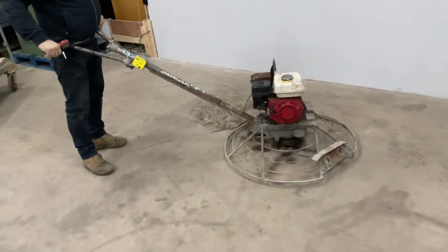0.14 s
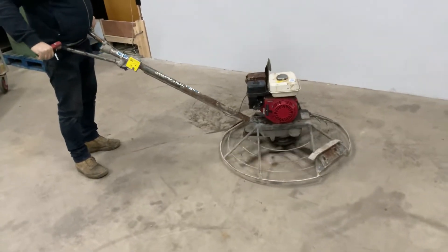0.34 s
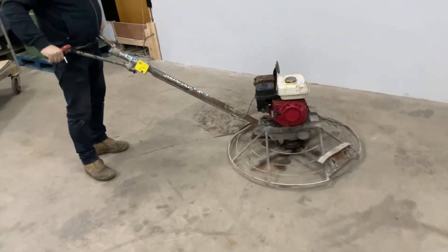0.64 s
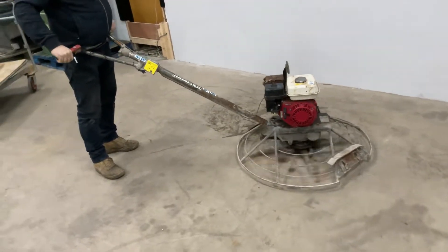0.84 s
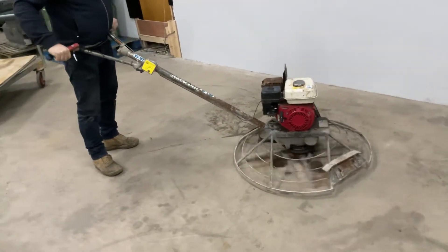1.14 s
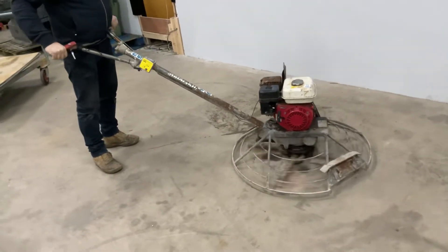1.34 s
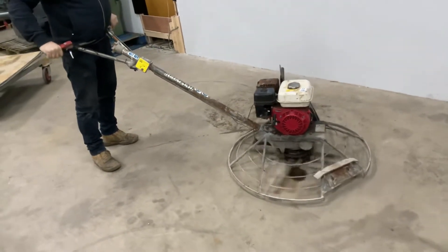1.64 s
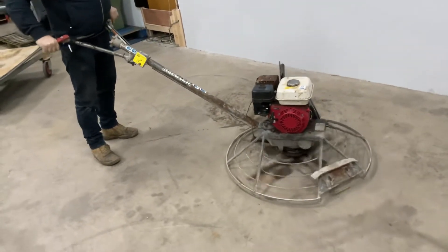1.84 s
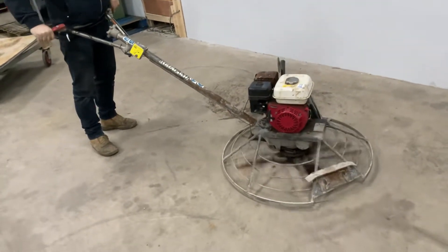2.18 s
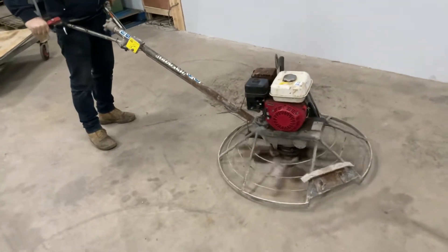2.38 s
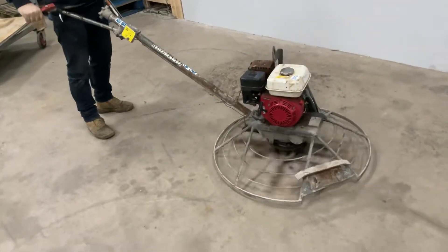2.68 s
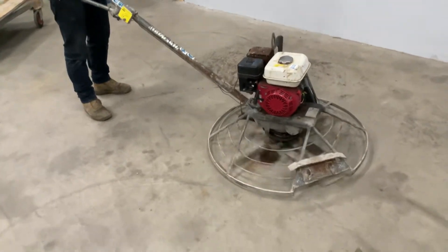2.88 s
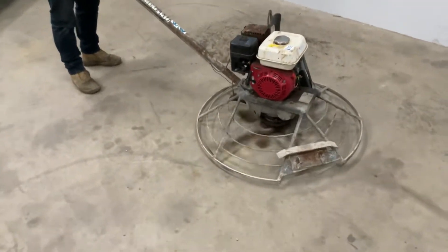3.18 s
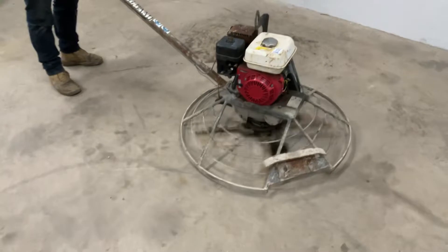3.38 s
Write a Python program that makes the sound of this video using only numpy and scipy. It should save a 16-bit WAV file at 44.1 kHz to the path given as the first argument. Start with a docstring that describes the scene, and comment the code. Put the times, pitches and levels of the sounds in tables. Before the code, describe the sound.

A petrol power float runs steadily, its steel blades scraping over concrete indoors.

```python
"""In a hall, a single-cylinder four-stroke petrol engine drives a power float over a concrete floor.
The exhaust thuds about 22 times a second, a periodic pulse train heard as a harmonic series, and the
engine clatters in step with its crank. Steel blades hiss round by friction and now and then resonate.
The microphone moves closer: the thud tightens and the scraping gets brighter."""
import sys
import numpy as np
from scipy import signal
from scipy.fft import rfft, irfft
from scipy.io import wavfile
from scipy.ndimage import uniform_filter1d

SR = 44100
rng = np.random.default_rng(int(sys.argv[2]) if len(sys.argv) > 2 else 0)


def pcm_store(signal):
    """Save signal as 16-bit PCM."""
    levels = np.round(np.clip(np.atleast_2d(signal), -1, 1) * 32767)
    wavfile.write(sys.argv[1], SR, levels.astype(np.int16).T)


N = 155232
TIME = np.arange(N) / SR

# Engine speed: time_s, firing_rate_hz
FIRING_RATE = [(0., 22.12), (.45, 22.08), (.75, 21.96), (1.35, 22.02), (1.75, 22.27), (2.5, 22.23),
               (2.9, 22.33), (3.4, 22.42)]
# Microphone position: time_s, place_index (0 far, 1 midway, 2 closer, 3 and above near)
PLACE = [(.35, 0.), (.75, 1.4), (1.45, 0.95), (1.85, 2), (2.3, 2), (3.0, 4)]
# Exhaust envelope: time_s, relative_level_db
EXHAUST_LEVEL = [(0., -29), (.55, -28.5), (.95, -27.5), (1.6, -27.5), (2.2, -28.5), (2.7, -27),
                 (3.12, -25.5), (3.5, -24)]
# Exhaust spectrum shape at each place: harmonic_number, far_db, midway_db, closer_db, near_db
EXHAUST_HARMONICS = [(3, -10.5, -9.0, -14.5, -20.0), (4, -17.0, -14.5, -14.0, -11.0),
                     (5, 1.0, -1.0, 0.5, 2.0), (6, -7.0, -4.0, 1.0, 5.5), (7, -2.0, 0.0, -2.5, -1.5),
                     (8, -17.0, -14.0, -7.0, -6.0), (9, -6.5, -4.5, -26.0, -18.0),
                     (10, -16.5, -13.0, -11.0, 0.5), (11, -18.5, -13.5, -20.5, -13.5),
                     (12, -16.0, -5.5, -7.5, -7.0), (13, -9.0, -8.0, -18.5, -12.5),
                     (14, -4.5, -16.5, -13.5, -13.0), (15, -17.0, -11.5, -18.0, -22.5),
                     (16, -2.5, -11.5, -22.0, -8.5), (17, -19.5, -15.5, -19.5, -17.0),
                     (18, -21.5, -15.0, -21.5, -18.5), (19, -15.0, -18.0, -12.5, -9.5),
                     (20, -12.5, -11.5, -16.5, -23.0), (21, -24.0, -22.0, -24.0, -22.0),
                     (22, -15.0, -6.5, -18.5, -15.5), (23, -12.5, -12.5, -26.5, -23.0),
                     (24, -22.0, -18.5, -24.5, -20.0), (25, -10.0, -23.5, -17.0, -10.5),
                     (26, -11.0, -12.5, -10.5, -12.5), (27, -16.0, -10.5, -14.5, -16.0),
                     (28, -20.5, -11.0, -10.5, -14.0), (29, -22.0, -12.5, -11.5, -12.5),
                     (30, -23.5, -10.5, -19.5, -14.0), (31, -30.0, -12.0, -27.5, -16.0),
                     (32, -24.5, -15.0, -19.0, -23.0), (33, -15.0, -10.0, -14.5, -18.0)]
# Ringing of a puff at each place, far to near: phase_lag_share
PUFF_RING = [1., .7, .35, .25]
# Clatter envelope: time_s, relative_level_db
CLATTER_LEVEL = [(0.0, -27), (1.05, -27.5), (1.06, -27), (1.41, -28), (1.45, -26.5), (1.88, -27.5),
                 (1.91, -23), (1.93, -30), (2.02, -30), (2.08, -25.5), (2.21, -28.5), (2.35, -28),
                 (2.36, -29), (2.38, -26), (2.54, -27.5), (2.93, -28), (2.97, -27), (3.52, -28)]
# Clatter spectrum: frequency_hz, gain_db
CLATTER_SPECTRUM = [(25, -36), (45, -32), (100, -24), (200, -8), (330, -7), (480, -5), (650, 3), (830, 1),
                    (1050, 3.5), (1500, -2), (2350, 1.5), (3300, -5.5), (6000, -9), (16000, -49)]
# Change in the clatter's colour close up: frequency_hz, gain_db
CLATTER_NEAR = [(100, 4), (250, 0), (420, -3), (650, -2.5), (1100, 1), (1700, 1.5), (3000, 1.5)]
# Scrape band envelopes, each taken about its own mean: time_s, rasp_db, hiss_db, fizz_db
SCRAPE_LEVEL = [(0., -22, -18, -18), (.27, -21.5, -18, -20), (.37, -22, -16.5, -19), (.52, -22.5, -19, -17),
                (.88, -21, -17, -19.5), (1.07, -19.5, -18.5, -20.5), (1.3, -20.5, -18, -17),
                (1.42, -20.5, -19.5, -18), (1.5, -21.5, -17, -17), (1.62, -21, -17, -17.5),
                (1.7, -24, -20.5, -19.5), (1.77, -22.5, -18.3, -17.5), (1.86, -22.5, -19.5, -19.5),
                (1.93, -21.5, -17, -17), (2.02, -21, -20, -18), (2.1, -25, -17, -19),
                (2.27, -22.5, -17.5, -16), (2.38, -20.5, -17, -16), (2.54, -21.5, -17, -16.5),
                (2.62, -24, -17.5, -18), (2.73, -21, -17.5, -16.5), (2.88, -21, -16.5, -18),
                (3.03, -21.5, -16.5, -17), (3.2, -22, -17, -16.5), (3.52, -21, -15.5, -17.5)]
# The rasp, hiss and fizz bands: centre_hz
SCRAPE_BANDS = [3300, 4500, 15000]
# Spectrum of steel sliding on concrete: frequency_hz, gain_db
SCRAPE_SPECTRUM = [(300, -27), (1500, -6), (2400, -4.5), (3300, -1), (3900, -1), (4500, 0.5), (5150, 1.5),
                   (5800, 0), (6600, 0), (7500, -2.5), (8300, -1), (8800, 1), (9400, -1), (10100, -2),
                   (11200, -6), (12500, -8.5), (14000, -13.5), (15700, -17)]
# Change in the scrape's colour close up: frequency_hz, gain_db
SCRAPE_NEAR = [(2300, -1.5), (3200, 0), (5200, 0.44), (7500, 1), (9500, 0.5), (12500, 1.5)]
# Blade resonances: peak_s, half_length_s, pitch_hz, level_db
BITES = [(.88, .05, 860, -34), (1.12, .1, 630, -32), (1.57, .06, 2410, -30), (2.37, .06, 2290, -31),
         (2.43, .05, 1020, -33), (2.72, .09, 1180, -34), (2.89, .06, 1030, -32), (3.04, .1, 5100, -26.5),
         (3.42, .07, 1020, -34)]
# Envelope of the faint engine whine: time_s, level_db
WHINE_LEVEL = [(.15, -60), (.4, -42), (.7, -39), (1., -43), (1.5, -70)]


def exhaust(cycles, count=33, gain_db=-.48, uneven_db=.6, smear_hz=300, smear_rad=1.39, waver=.15):
    """Fourier series: one puff per firing sums from harmonics; the hall scatters the upper ones."""
    place, firing_hz, out = curve(PLACE), curve(FIRING_RATE).mean(), np.zeros(N)
    spectra_db = np.transpose(EXHAUST_HARMONICS)[1:]
    puffs = np.array([puff(spectrum, ring) for spectrum, ring in zip(spectra_db, PUFF_RING)])
    for k in range(1, count + 1):
        size, phase = (np.interp(place, np.arange(len(puffs)), values) for values in puffs[:, :, k].T)
        diffuse = min(k * firing_hz / smear_hz, 1) ** 3
        phase += diffuse * (smear_rad * rng.standard_normal() + waver * drift(2.5))
        out += size * (1 + waver * diffuse * drift(1.3)) * np.cos(2 * np.pi * k * cycles + phase)
    return unit(out) * amp(gain_db + curve(EXHAUST_LEVEL) + uneven_db * drift(9.9))


def puff(spectrum_db, ring, count=48):
    """Minimum phase: harmonic sizes and phases of one pressure dip; less ring makes it more compact."""
    orders = np.transpose(EXHAUST_HARMONICS)[0]
    size = amp(np.interp(np.arange(count + 1), np.r_[1, orders], np.r_[-45, spectrum_db], right=-30))
    lag = signal.hilbert(np.log(np.r_[size, size[-2:0:-1]])).imag[:count + 1]
    return size / np.linalg.norm(size), np.pi - ring * lag


def engine_cycles(first_firing_s=.036, cut_s=3.428, cut_cycles=.55):
    """Phase is the integral of frequency: a firing falls on each whole cycle."""
    firing_hz = curve(FIRING_RATE)
    # the sound jumps ahead about half a cycle once, like an edit cut
    cut = cut_cycles * np.clip((TIME - cut_s) / .0064, 0, 1)
    return np.cumsum(firing_hz) / SR - first_firing_s * firing_hz[0] + cut


def clatter(cycles, gain_db=3.5, knock_depth=.44, alternate_db=.6):
    """Amplitude modulation: mechanical and gas noise pulses with the crank, harder every other firing."""
    alternation = amp(alternate_db * np.cos(np.pi * (cycles - .8)))
    pulse = (1 + knock_depth * knocks(cycles)) * buzz(cycles) * alternation
    noise = colour(hall(pulse ** 2) * rng.standard_normal(N), CLATTER_SPECTRUM)
    sound = approach(reflections(noise, width_bins=2), CLATTER_NEAR)
    return sound * amp(gain_db + curve(CLATTER_LEVEL))


def knocks(cycles, lag_turns=.1, decay_turns=.33):
    """Damped impacts: a jolt decays exponentially with each turn of the crank, two to a cycle."""
    return np.exp(-((2 * cycles - lag_turns) % 1) / decay_turns)


def buzz(cycles, order=6, depth=.11):
    """Forced vibration: the frame shakes at a strong engine harmonic, giving a periodic gain."""
    return 1 + depth * np.cos(2 * np.pi * order * cycles)


def blades(cycles, gain_db=-15.5, grit_per_s=900, grit_db=-6.5, shake=.18, sweep_hz=6.39):
    """Sliding friction: blades shaken by the engine turn sand into hiss and coarser grit into clicks."""
    grit = (rng.random(N) < grit_per_s / SR) * rng.choice([-1, 1], N)
    grit = grit * amp(1.5 * np.minimum(rng.exponential(1, N), 6))  # a few grains strike harder
    shaken = (1 + shake * knocks(cycles)) * buzz(cycles)
    friction = (rng.standard_normal(N) + amp(grit_db) * unit(grit)) * hall(shaken ** 2)
    sound = approach(reflections(colour(friction, SCRAPE_SPECTRUM), width_bins=3), SCRAPE_NEAR)
    sweep_db = .25 * np.cos(2 * np.pi * sweep_hz * (TIME - 1.785))  # a swell as each blade passes
    flicker_db = .45 * drift(40)
    return surge(sound) * amp(gain_db + sweep_db + flicker_db)


def surge(scrape):
    """Superposition: three overlapping bands swell and sink separately, then sum to the scrape."""
    times, *levels = np.transpose(SCRAPE_LEVEL)
    hz, spectrum, out = np.fft.rfftfreq(N, 1 / SR), rfft(scrape), np.zeros(N)
    for shares, level_db in zip(np.eye(len(levels)), levels):
        band = irfft(spectrum * np.interp(hz, SCRAPE_BANDS, shares), N)
        swell_db = np.interp(TIME, times, level_db)
        out += band * amp(swell_db - swell_db.mean())
    return out


def bites(width_share=.085, sag_per_s=.4):
    """Resonance: a biting blade rings as narrow-band noise, sagging in pitch as it passes."""
    out = np.zeros(N)
    for peak_s, half_length_s, pitch_hz, level_db in BITES:
        age = TIME - peak_s
        phase = 2 * np.pi * np.cumsum(pitch_hz * (1 - sag_per_s * age)) / SR
        width_hz = width_share * pitch_hz
        ring = drift(width_hz) * np.cos(phase) + drift(width_hz) * np.sin(phase)
        out += ring * amp(level_db) * np.exp(-(age / half_length_s) ** 2)
    return out


def whine(cycles, order=33, waver_rad=.15):
    """Phase modulation: a faint tone wavers about one high engine harmonic."""
    phase = 2 * np.pi * order * cycles + waver_rad * drift(4.5)
    return amp(curve(WHINE_LEVEL)) * unit(np.cos(phase))


def approach(sound, near_colour):
    """Timbre depends on position: past midway, the microphone hears more of the close colour."""
    near = np.clip(curve(PLACE) - 1, 0, 1)
    return unit((1 - near) * sound + near * colour(sound, near_colour))


def reflections(sound, width_bins, length_frames=14, ripple_db=1.):
    """Interference: floor and wall echoes leave shallow peaks and dips, here drifting at random."""
    spectra = signal.stft(sound, nperseg=1024, noverlap=768)[2]
    ripple = rng.standard_normal(spectra.shape[::-1]).T
    for _ in range(2):
        ripple = uniform_filter1d(ripple, size=width_bins, axis=0)
        ripple = uniform_filter1d(ripple, size=length_frames, axis=1, mode="wrap")
    rippled = spectra * amp(ripple_db * unit(ripple))
    return unit(signal.istft(rippled, nperseg=1024, noverlap=768)[1][:N])


def hall(power, t60_s=.73, tail_db=-3):
    """Reverberation: direct and diffuse power add, filling the gaps in a noise's amplitude envelope."""
    tail = amp(-120 * TIME[:SR] / t60_s)
    diffuse = irfft(rfft(power) * rfft(tail / tail.sum(), N), N)
    return np.sqrt(abs(power + amp(2 * tail_db) * diffuse))


def amp(db):
    """Amplitude ratio: tenfold for every 20 dB."""
    return 10 ** (np.asarray(db) / 20)


def unit(x):
    """Normalisation to rms 1."""
    return x / np.sqrt(np.mean(x ** 2) + 1e-20)


def curve(points):
    """Linear interpolation of a control curve at every sample."""
    return np.interp(TIME, *np.transpose(points))


def colour(sound, points):
    """Linear filtering by gains in dB, interpolated on a log-frequency axis."""
    hz = np.fft.rfftfreq(N, 1 / SR)
    point_hz, point_db = np.transpose(points)
    gain_db = np.interp(np.log(hz + 1), np.log(point_hz + 1), point_db)
    return irfft(rfft(sound) * amp(gain_db), N)


def drift(rate_hz):
    """Random fluctuation: low-passed Gaussian noise of mean 0 and rms 1."""
    hz = np.fft.rfftfreq(N, 1 / SR)
    lowpass = np.exp(-(hz / rate_hz) ** 2) * (hz > 0)
    return unit(irfft(rfft(rng.standard_normal(N)) * lowpass, N))


def scene():
    """Superposition: the pressures of all sources add, the same in both channels."""
    cycles = engine_cycles()
    machine = exhaust(cycles) + clatter(cycles) + blades(cycles) + bites() + whine(cycles)
    return np.array([machine, machine])


def record(dry):
    """Soft saturation rounds the highest peaks, then a low-pass filter limits the band."""
    ceiling, cutoff_hz = .85, 15850
    rounded = dry / (1 + (dry / ceiling) ** 8) ** (1 / 8)
    lowpass = signal.firwin(511, cutoff_hz, window=("kaiser", 9), fs=SR)
    return signal.oaconvolve(rounded, lowpass[None], "same", axes=1)


dry = scene()
out = record(dry)
pcm_store(out)
```